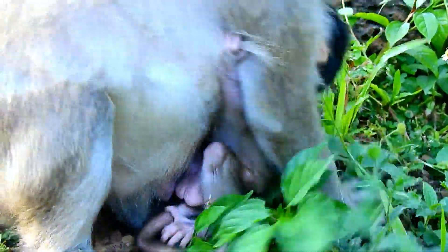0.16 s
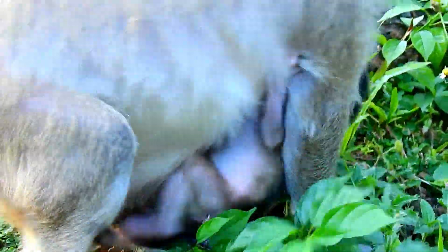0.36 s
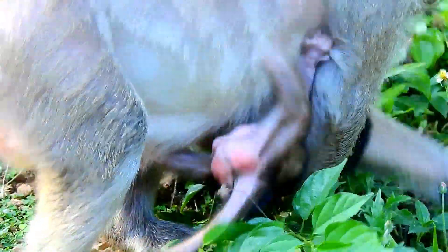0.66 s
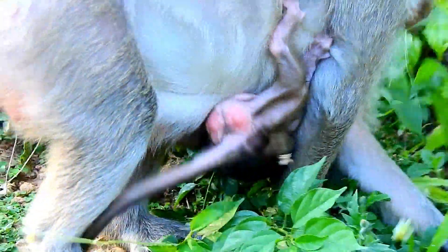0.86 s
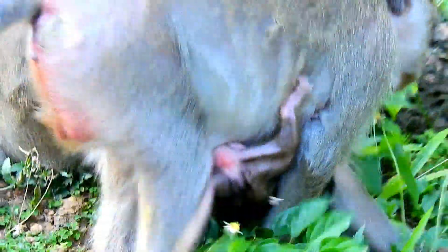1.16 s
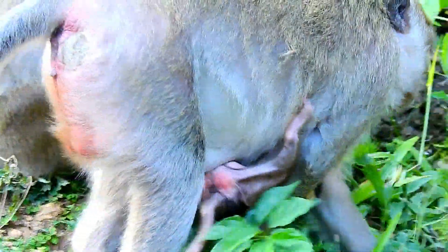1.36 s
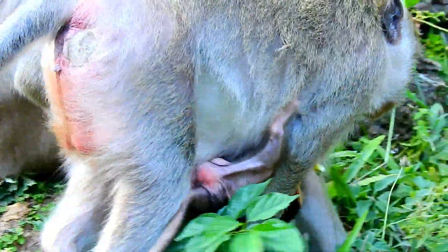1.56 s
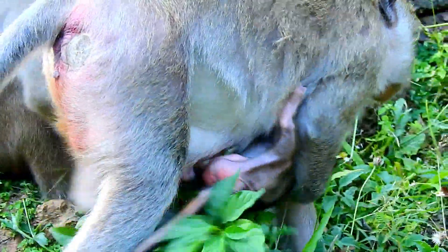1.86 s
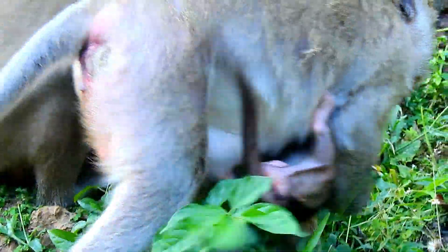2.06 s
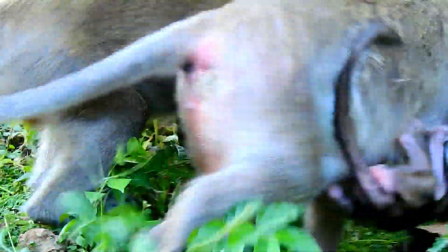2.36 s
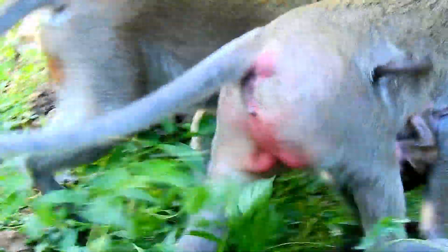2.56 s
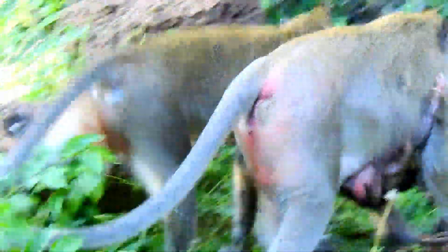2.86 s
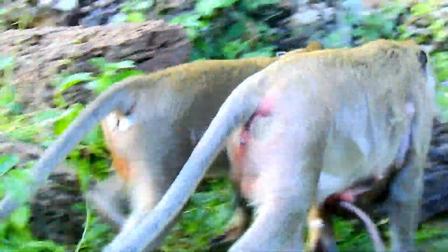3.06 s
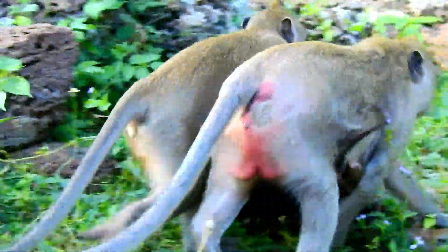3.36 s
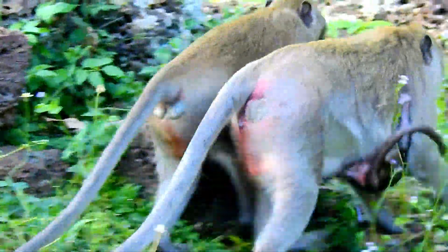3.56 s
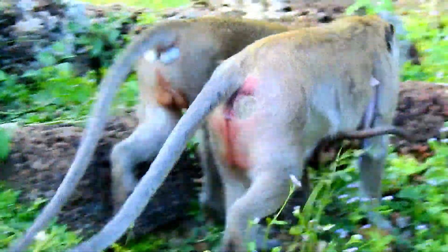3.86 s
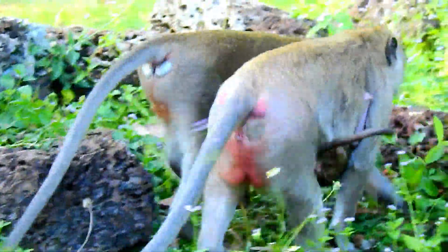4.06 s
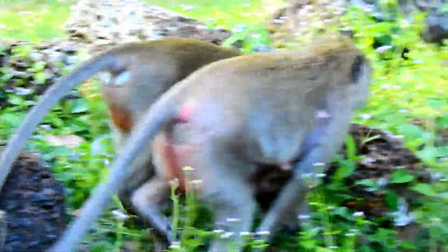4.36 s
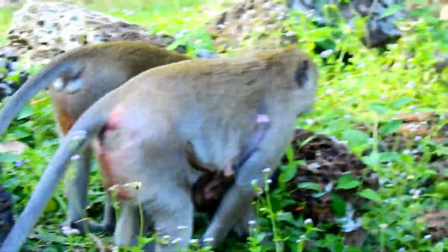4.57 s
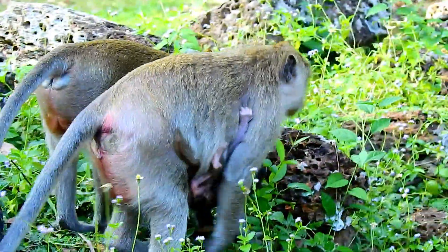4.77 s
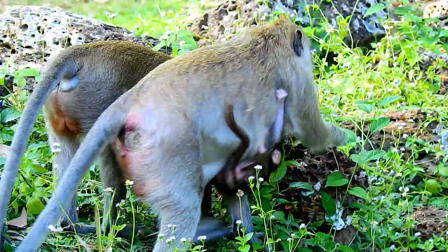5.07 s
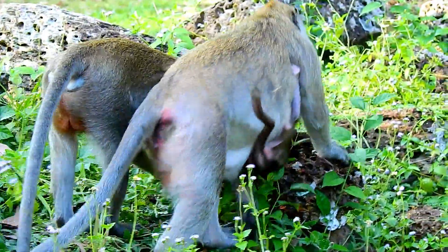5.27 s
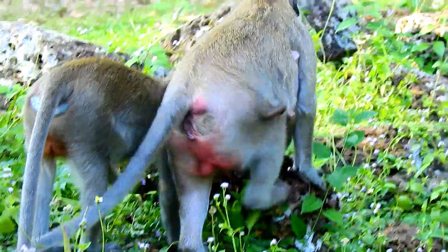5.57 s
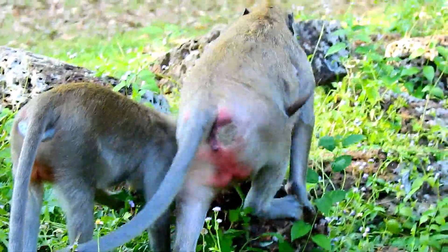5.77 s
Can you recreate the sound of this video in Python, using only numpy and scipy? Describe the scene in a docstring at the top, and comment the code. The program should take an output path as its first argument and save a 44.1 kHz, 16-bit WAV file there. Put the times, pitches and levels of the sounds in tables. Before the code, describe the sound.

A newborn monkey gives short, shrill, arching squeals that turn hoarse, while twigs snap sharply and leaves rustle underfoot outdoors.

```python
"""Newborn monkey squealing among trees

A newborn monkey, carried through low plants, gives short arched squeals that scoop up, sag and break into a rasp.
Some catch on a higher pitch, one follows a breaking whistle, and the last are hoarse screams; all are harmonics
of vocal folds, coloured by throat and mouth. Twigs snap under the walking adults as noise bursts in resonators.
Leaves and stems rustle as swelling band noise over a far rumble, with one faint far note at the start.
The trees return a soft echo, made by convolving with fading noise."""
import sys
import numpy as np
from scipy import signal
from scipy.fft import rfft, irfft, next_fast_len
from scipy.io import wavfile
from scipy.ndimage import uniform_filter1d

SR = 44100
rng = np.random.default_rng(int(sys.argv[2]) if len(sys.argv) > 2 else 0)


def dump_mix(stems):
    """Bounce the given channels to the path in sys.argv[1] as a 16-bit WAV at rate SR."""
    frames = np.atleast_2d(stems).T  # one column per channel
    limited = np.clip(frames, -1, 1)  # hard clip at full scale
    pcm = np.round(limited * 32767).astype(np.int16)
    wavfile.write(sys.argv[1], SR, pcm)


N = 261072
TIME = np.arange(N) / SR


def from_db(db):
    """Decibels to gain."""
    return 10 ** (np.asarray(db) / 20)


def rms_one(x):
    """Scale to unit rms."""
    return x / np.sqrt(np.mean(x ** 2) + 1e-20)


def in_time(rows, t=TIME):
    """The columns of a curve in time, joined by straight lines."""
    seconds, *columns = np.transpose(rows)
    return [np.interp(t, seconds, column) for column in columns]


def at_hz(points, hz):
    """The columns of a spectrum, read on a log-frequency axis."""
    point_hz, *columns = np.transpose(points)
    log_hz = np.log(np.maximum(hz, 1))
    return [np.interp(log_hz, np.log(point_hz), column) for column in columns]


def bump(x, centre, width):
    """A bell of height 1 round a frequency or a moment."""
    return np.exp(-((x - centre) / width) ** 2)


def drift(rate, size=N):
    """Smooth chance of rms 1: white noise through two equal one-pole lowpasses at about the rate in Hz."""
    pole = np.exp(-2 * np.pi * rate / SR)
    run_in = SR // 2
    white = rng.standard_normal(size + run_in)
    smooth = signal.lfilter([1], [1, -2 * pole, pole * pole], white)
    return rms_one(smooth[run_in:])


def chance(t, rate):
    """Smooth chance for the length of one call."""
    return drift(rate, size=SR // 2)[:len(t)]


def panned(x, pan_db):
    """Share a sound between left and right; positive dB leans left."""
    return x * from_db(np.array([[.5], [-.5]]) * pan_db)


# How alike diffuse sound is at the two microphone ports.
# Each row: frequency in Hz, likeness (1 the same, 0 unrelated, below 0 opposed).
PORT_LIKENESS = [(200, .995), (700, .96), (1500, .9), (3000, .78), (5000, .4), (7000, -.2), (12000, 0)]


def diffuse_bands(size):
    """Sound from all round as half-octave noise bands (Hz, stereo), less alike left and right in the treble."""
    edges = 27 * 2 ** np.arange(0, 9.6, .5)
    white = rng.standard_normal((2, 2, size))
    for k, (low, high) in enumerate(zip(edges, edges[1:])):
        band_filter = signal.butter(2, [low, high], "band", fs=SR, output="sos")
        mid, side = signal.sosfilt(band_filter, white[k % 2])
        hz = np.sqrt(low * high)
        alike = np.clip(at_hz(PORT_LIKENESS, hz)[0], -1, 1)
        yield hz, np.sqrt(1 + alike) * mid + np.sqrt(1 - alike) * np.array([side, -side])


def airy_noise(spectrum, patchy_db, rate):
    """Diffuse noise whose bands swell and fade on their own; rms 1."""
    lowest_hz, highest_hz = spectrum[0][0] / 2, spectrum[-1][0] * 2
    noise = 0
    for hz, band in diffuse_bands(N):
        if lowest_hz < hz < highest_hz:
            noise = noise + band * from_db(at_hz(spectrum, hz)[0] + patchy_db * drift(rate))
    return rms_one(noise)


# Colour of the far rumble. Each row: frequency in Hz, relative level in dB.
RUMBLE_COLOUR = [(25, -27), (48, -25.5), (72, 5.5), (100, -5.5), (160, 0), (230, -5.5), (330, -15.5),
                 (500, -16.5), (1000, -13), (3000, -83)]


def far_rumble(level_db=-58.5):
    """Low diffuse noise whose bands waver gently."""
    return from_db(level_db) * airy_noise(RUMBLE_COLOUR, patchy_db=2.2, rate=14.8)


# Colour of swishing stems. Each row: frequency in Hz, relative level in dB.
STEM_COLOUR = [(300, -46), (550, -17), (800, 5), (1050, 5.5), (1450, 4), (2500, -2.5), (4500, -59),
               (8000, -57)]
# Colour of crackling leaves. Each row: frequency in Hz, relative level in dB.
LEAF_COLOUR = [(1500, 3.5), (3000, 4), (5000, 3.5), (6700, 6.5), (8500, -19), (11000, -46), (15000, -44)]
# Feet brushing through the plants.
# Each row: middle in seconds, half length in seconds, stems in dB before their gain, leaves in dB before crackle.
FOOT_BRUSHES = [(0.087, 0.035, -79, -82), (0.302, 0.27, -61, -59), (0.704, 0.12, -58, -46.5),
                (1.166, 0.12, -59.5, -42), (2.063, 0.89, -59.5, -56), (2.683, 0.062, -57, -71.5),
                (2.997, 0.29, -51.5, -79), (3.73, 0.094, -53, -55), (3.993, 0.085, -58, -54.5),
                (4.244, 0.088, -51.5, -49), (4.682, 0.15, -52, -61), (4.993, 0.042, -53, -82),
                (5.34, 0.32, -54.5, -85), (5.815, 0.83, -84, -54.5)]
# the plants never fall quite still
STIR_STEMS_DB, STIR_LEAVES_DB = -59, -78


def undergrowth(stems_gain_db=2, crackle_db=2):
    """Stems swish in short lumps and leaves crackle, swelling with each brush of a foot."""
    stems, leaves = from_db(STIR_STEMS_DB), from_db(STIR_LEAVES_DB)
    for middle_s, half_s, stems_db, leaves_db in FOOT_BRUSHES:
        push = bump(TIME, middle_s, half_s)
        # unrelated noises add by power
        stems = np.sqrt(stems ** 2 + push * from_db(stems_db) ** 2)
        leaves = np.sqrt(leaves ** 2 + push * from_db(leaves_db) ** 2)
    swish = airy_noise(STEM_COLOUR, patchy_db=3.2, rate=13)
    crackle = from_db(crackle_db * drift(68)) * airy_noise(LEAF_COLOUR, patchy_db=2.5, rate=3)
    return from_db(stems_gain_db) * stems * swish + leaves * crackle


# A faint far note: middle in seconds, half length in seconds, frequency in Hz, level in dB.
DISTANT_NOTE = (.12, .2, 1070, -61)


def far_note():
    """A faint tone, unsteady in strength and phase, swells and fades under a bell."""
    middle_s, half_s, hz, level_db = DISTANT_NOTE
    waver = drift(22) + 1j * drift(19)
    tone = np.real(waver * np.exp(2j * np.pi * hz * TIME))
    return from_db(level_db) * bump(TIME, middle_s, half_s) * tone


# Resonances of the infant's throat. Each row: frequency in Hz, relative gain in dB.
THROAT_COLOUR = [(850, -47), (1750, -10), (2040, 9), (2300, 2.5), (2660, 5), (3050, 2), (3370, 6),
                 (3550, 3.5), (3850, 5.5), (4350, -4.5), (5100, 4.5), (5600, 1.5), (6100, 16.5),
                 (6950, 17.5), (7600, 1), (8500, 1), (9400, -19.5), (10500, -14), (11500, -42),
                 (15000, -68)]


def levelled(gains):
    """Scale harmonic gains so that together they have rms 1."""
    return gains / np.sqrt(np.sum(gains ** 2, axis=0) / 2)


def harmonic_gains(hz, mouth, bright_db):
    """Throat and mouth weigh the harmonics; brightness sets those near 6-7 kHz and above 9 kHz."""
    peak_hz, peak_db, notch_hz, notch_db, top_db = mouth
    mouth_db = peak_db * bump(hz, peak_hz, 430) + notch_db * bump(hz, notch_hz, 550)
    gains = from_db(at_hz(THROAT_COLOUR, hz)[0] + mouth_db)
    above = np.clip((hz - 5400) / 350, 0, 1)
    # the shrill top, near 7.5-8.9 kHz, stays with the lower group
    top = np.interp(hz, [7200, 7550, 8900, 9300], [0, 1, 1, 0])
    lower = gains * (1 - above + top * from_db(top_db))
    upper = gains * (above - top)
    return levelled(lower) + from_db(bright_db) * levelled(upper)


LURCH, LURCH_PER_S = .028, 28   # rms pitch lurch as a share, at roughness 1
DOUBLING = .6   # alternate cycles grow and weaken by this share, at roughness 1
FLUTTER_DB = 2   # each harmonic wavers on its own


def folds(t, pitch, rough, mouth, bright_db, jitter=0.022, jitter_hz=170, waver=0.0029,
          shimmer=0.26, air_db=-5, hiss_db=-22):
    """Vocal folds through throat and mouth; roughness shakes pitch and strength, doubles the period, adds air."""
    shake = jitter * chance(t, jitter_hz) + LURCH * chance(t, LURCH_PER_S)
    unsteady = rough * shake + waver * chance(t, 72)
    phase = 2 * np.pi * np.cumsum(pitch * (1 + unsteady)) / SR
    hz = np.arange(1, 18)[:, None] * pitch
    gains = harmonic_gains(hz, mouth, bright_db) * (hz < SR / 2)
    air = from_db(air_db) * rough + from_db(hiss_db)
    voice = 0
    for k, gain in enumerate(gains, 1):
        # turbulent air spreads a skirt of noise round every harmonic
        skirt = air * (chance(t, 450) + 1j * chance(t, 510))
        flutter = from_db(FLUTTER_DB * chance(t, 13.6))
        carrier = np.exp(1j * (k * phase + rng.uniform(0, 2 * np.pi)))
        voice = voice + gain * flutter * np.real((1 + skirt) * carrier)
    strength = 1 + rough * (shimmer * chance(t, 240) + DOUBLING * np.cos(phase / 2))
    # keep the power the same however rough the voice
    return voice * strength / np.sqrt(1 + rough ** 2 * (shimmer ** 2 + DOUBLING ** 2 / 2))


SCOOP_S = .024   # the pitch starts low and scoops up over about this time
DROP_POWER = 5   # the higher, the later and steeper the final drop


def arch_pitch(t, start, end, scoop, pitch_hz, sag_hz_per_s, drop_hz):
    """As tension builds and lets go, the pitch scoops up, sags steadily, and drops away at the end."""
    age = np.maximum(t - start, 0)
    progress = np.minimum(age / (end - start), 1)
    scooped_hz = pitch_hz * (1 - scoop * bump(age, 0, SCOOP_S))
    return scooped_hz - sag_hz_per_s * age - drop_hz * progress ** DROP_POWER


# The squeals.
# Each row: start, loudest moment, end, attack and final rasp time scale in seconds, level in dB before the
# voice gain, swell and fade in dB per second, shrillness at first and at last in dB before the hold,
# scoop as a share of the pitch, pitch in Hz before scoop and sag, sag in Hz per second, final drop in Hz,
# roughness from 0 to 1 before the rattle at the ends.
SQUEAL_CALLS = [ (0.416, .5, .625, 0.026, 0.03, -39, 48, 34, 9.5, 10, 0.21, 908, 350.3, 38, 0),
                (0.952, 1.064, 1.165, 0.033, 0.024, -38, 115, 65, 5.5, 2, .14, 903.3, 167.8, 97, 0),
                (1.654, 1.71, 1.9, 0.034, 0.088, -36, 66, 30.5, -0.5, 2, 0.19, 893, 318, 105, 0.07),
                (2.174, 2.32, 2.365, 0.0098, 0.064, -40.5, 38, 31, -8.5, 8.5, 0.078, 891, 261, 35, 0.24),
                (2.374, 2.387, 2.575, 0.022, 0.05, -38, 105, 47, -6, 5, 0.069, 896.7, 100.4, 61, 0.13),
                (2.876, 2.974, 3.09, 0.046, .018, -45.5, 7, 55, -15, 1, 0.17, 853, 220.7, 71, 0.28),
                (3.088, 3.184, 3.28, 0.0069, 0.093, -40.5, 81, 96, -10.5, 2.5, 0.086, 899, 91.4, 39, 0.24),
                (3.388, 3.405, 3.6, 0.011, 0.042, -40.5, 80, 40, 1.5, 3, 0.18, 890, 290, 45, 0.17),
                (3.67, 3.708, 3.865, 0.035, 0.031, -34.5, 56, 111, -10, -11.5, 0.17, 861, 227.5, 88, 0.05),
                (4.145, 4.26, 4.37, 0.018, 0.0594, -44, 45, 21, -13.5, 8.5, 0.18, 903, 275.6, 24.7, .16),
                (4.401, 4.475, 4.56, 0.039, 0.013, -42, 79, 82, -4, -16, 0.023, 861, 335, 11, 0.28),
                (4.55, 4.632, 4.775, 0.064, 0.032, -35.5, 72, 51, -8, 3.5, .16, 918, 380.3, 115, .42),
                (5.298, 5.346, 5.425, 0.056, 0.028, -42.5, 56, 110, -2.5, -2.5, .02, 1060, 606, 56, 0.58),
                (5.525, 5.617, 5.71, 0.02, 0.014, -45, 42, 61, -3.5, -6, 0.022, 1033, 149.6, 70, 0.37)]
# The mouth in each squeal.
# Each row: resonance at first and at last in Hz, its gain in dB, antiresonance in Hz, its gain in dB,
# gain of the shrill top in dB.
SQUEAL_MOUTHS = [(5300, 5150, 8, 4350, -6, -6), (3500, 2600, 6, 4400, -7, -7),
                 (3550, 3400, 3, 2450, -3, -5), (5200, 5000, 5, 2550, -7, 3), (3600, 2500, 7, 4300, -2, -4),
                 (5000, 4900, 7, 4150, -4, 4), (3650, 3450, 5, 2600, -4, 5), (3700, 2200, 6, 5200, -1, 5),
                 (5100, 4800, 12, 5900, -6, 0), (3600, 3400, 3, 7900, -6, 2), (5150, 4950, 5, 2500, -3, -1),
                 (2650, 2600, 4, 6050, -3, -9), (3150, 3050, 9, 7450, -12, -14),
                 (3150, 2850, 8, 5150, -3, -10)]
SHRILL_HOLD = 0.59   # share of the swell and fade that the shrill harmonics do not follow
TREMBLE_DB, TREMBLE_PER_S = 2.5, 25   # the infant's effort is unsteady
# the folds rattle as tension builds and lets go
ONSET_SLACK, ONSET_RASP_S, EDGE_ROUGH = 0.59, 0.053, 0.58
RELEASE_S = 0.077   # closing fade, centred on the end of the squeal


def squeal(row, mouth):
    """A squeal swells and fades, raspier at its slack ends than at full tension, while the mouth glides."""
    (start, loudest, end, attack_s, rasp_s, peak_db, swell_db_per_s, fade_db_per_s,
     first_db, last_db, scoop, pitch_hz, sag_hz_per_s, drop_hz, roughness) = row
    first_hz, last_hz, *shape = mouth
    span = (TIME > start) & (TIME < end + RELEASE_S / 2)
    t = TIME[span]
    below_db = np.maximum(swell_db_per_s * (loudest - t), fade_db_per_s * (t - loudest))
    bright_db = np.interp(t, [start, end], [first_db, last_db]) + SHRILL_HOLD * below_db
    resonance_hz = np.interp(t, [start, end], [first_hz, last_hz])
    pitch = arch_pitch(t, start, end, scoop, pitch_hz, sag_hz_per_s, drop_hz)
    onset_slack = ONSET_SLACK * np.clip(1 - (t - start) / ONSET_RASP_S, 0, 1)
    final_slack = np.clip(1.5 - (end - t) / rasp_s, 0, 1)
    rough = np.clip(roughness + EDGE_ROUGH * np.maximum(onset_slack, final_slack), 0, 1.2)
    attack = np.clip((t - start) / attack_s, 0, 1) ** 1.32
    release = np.clip((t[-1] - t) / RELEASE_S, 0, 1)
    level = attack * release * from_db(peak_db - below_db + TREMBLE_DB * chance(t, TREMBLE_PER_S))
    out = np.zeros(N)
    out[span] = level * folds(t, pitch, rough, (resonance_hz, *shape), bright_db)
    return out


def tear(s, peak_db, hz, width_hz, decay_s, low_cut_hz=790, strength_db=-5):
    """Tearing fibres: a burst of a few milliseconds rings a damped resonance of the wood."""
    t = TIME[:SR // 20]
    # something so small gives off little bass
    small_size = signal.butter(7, low_cut_hz, "high", fs=SR, output="sos")
    pole = np.exp(-np.pi * width_hz / SR)
    resonance = [1, 0, -1, 1, -2 * pole * np.cos(2 * np.pi * hz / SR), pole * pole]
    fibres = rng.choice([-1, 1], len(t)) * np.exp(-t / decay_s)
    burst = signal.sosfilt(np.vstack([small_size, resonance, resonance]), fibres)
    loudness = np.sqrt(np.sum(burst ** 2) / (decay_s * SR / 2))
    out, at = np.zeros(N), round(s * SR)
    out[at:at + len(t)] = burst * from_db(peak_db + strength_db) / loudness
    return out


# Breaking twigs.
# Each row: moment in seconds, crack in dB before the tear strength, crack centre in Hz, crack left-right in dB,
# knock in dB before mode levels and tear strength, knock base in Hz, width of each knock resonator in Hz,
# knock left-right in dB.
TWIG_SNAPS = [ (0.652, -23, 6570, -3, -61, 1300, 1000, 0), (0.767, -56, 6000, 16, -34, 1080, 600, -10),
              (1.0323, -11, 6120, -16.5, -14, 1300, 1640, 7), (1.435, -47.5, 6800, 22, -42, 1310, 1410, -7),
              (1.994, -26.5, 7400, -2, -76, 1290, 1005, 11), (2.581, -12, 6630, -14, -8, 1064, 320, 3),
              (2.902, -51, 4440, -9, -28.5, 1310, 960, 4.5),
              (3.6914, -20.5, 3800, -3, -19.5, 1920, 1250, -13), (5.357, -44, 5000, 6, -29, 1380, 1000, 6)]
# Modes of a knocking twig. Each row: multiple of its knock base, relative level in dB.
WOOD_MODES = [(.8, -5.5), (1.039, -3.5), (1.5, -13), (2.0, -6), (3.0, -11)]
CRACK_WIDTH_HZ, CRACK_S = 2580, 0.0025   # the bright crack of the tearing fibres
KNOCK_LAG_S, KNOCK_S = 0.001, 0.002   # the woody knock that follows


def twigs():
    """Each twig gives a bright crack and then a knock in its modes; returns (cracks, knocks)."""
    cracks, knocks = 0, 0
    for s, crack_db, crack_hz, crack_pan_db, knock_db, knock_hz, width_hz, knock_pan_db in TWIG_SNAPS:
        crack = tear(s, crack_db, crack_hz, CRACK_WIDTH_HZ, CRACK_S)
        cracks = cracks + panned(crack, crack_pan_db)
        knock = 0
        for multiple, mode_db in WOOD_MODES:
            knock = knock + tear(s + KNOCK_LAG_S, knock_db + mode_db, multiple * knock_hz, width_hz, KNOCK_S)
        knocks = knocks + panned(knock, knock_pan_db)
    return cracks, knocks


# A wavering whistle that breaks up into the third squeal.
# Each row: moment in seconds, pitch in Hz before jitter, level in dB before the voice gain, roughness from 0 to 1.
WHISTLE_PATH = [(1.553, 6050, -49, 0.1), (1.567, 5250, -44, 0), (1.58, 5600, -38, 0.22),
                (1.59, 6100, -46, 0.8), (1.602, 6460, -31, 0.53), (1.617, 5240, -39, 0.49),
                (1.635, 4810, -49, 0.6), (1.652, 5600, -34, 0.7), (1.668, 5660, -31, 0.7)]


def whistle(jitter=0.122, jitter_hz=500):
    """One high partial whose pitch grows unsteady with roughness."""
    pitch, level_db, rough = in_time(WHISTLE_PATH)
    sounding = (TIME > WHISTLE_PATH[0][0]) & (TIME < WHISTLE_PATH[-1][0])
    gate = uniform_filter1d(1.0 * sounding, size=200)   # softened edges
    phase = 2 * np.pi * np.cumsum(pitch * (1 + jitter * rough * drift(jitter_hz))) / SR
    return gate * from_db(level_db) * np.sqrt(2) * np.sin(phase)


# The voice catches in a higher register before or during some squeals.
# Each row: start and end in seconds, level in dB before the voice gain, starting pitch in Hz,
# glide in Hz per second, shrillness in dB, roughness from 0 to 1, mouth resonance in Hz.
VOICE_CATCHES = [(2.142, 2.187, -50, 1490, 700, 13.5, 0.33, 4500),
                 (4.558, 4.598, -35.5, 1542, -1200, -18, 0.85, 3050),
                 (4.585, 4.634, -38, 1320, 1900, 4, 0.33, 4100),
                 (5.115, 5.155, -53.5, 1418, 800, -9, 0.72, 2950),
                 (5.276, 5.377, -46.5, 1505, 1000, -3, 0.43, 3100),
                 (5.566, 5.618, -48, 1370, 800, -8, 0.57, 4200),
                 (5.653, 5.737, -45, 1548, -1500, -21, 0.14, 2950)]
# gain of that resonance, of the shrill top; rise and fall
CATCH_MOUTH_DB, CATCH_TOP_DB, CATCH_EDGE_S = 11, -15, 0.017


def catch(row):
    """A brief squeak: the folds sound on a high, gliding pitch."""
    start, end, level_db, pitch_hz, glide_hz_per_s, bright_db, roughness, resonance_hz = row
    span = (TIME > start) & (TIME < end)
    t = TIME[span]
    gate = np.clip(np.minimum(t - start, end - t) / CATCH_EDGE_S, 0, 1)
    mouth = (resonance_hz, CATCH_MOUTH_DB, resonance_hz, 0, CATCH_TOP_DB)   # no antiresonance
    pitch = pitch_hz + glide_hz_per_s * (t - start)
    out = np.zeros(N)
    out[span] = gate * from_db(level_db) * folds(t, pitch, roughness, mouth, bright_db)
    return out


def infant():
    """The whole voice: squeals, catches and the whistle."""
    squeals = sum(squeal(row, mouth) for row, mouth in zip(SQUEAL_CALLS, SQUEAL_MOUTHS))
    catches = sum(catch(row) for row in VOICE_CATCHES)
    return squeals + catches + whistle()


# Echo among the trees.
# Each row: frequency in Hz, relative level in dB, time to fall by 60 dB in seconds before the early lift.
TREE_ECHO = [(495, -13, 1.2), (1290, 16, 0.27), (2750, 7.5, 0.64), (3560, 7, 0.69), (4520, 13, 0.5),
             (6290, 6, 0.39), (8500, 2, 0.71), (13200, -11, 0.81)]


def trees(x, build_s=0.0027, early_db=3, early_s=0.17):
    """Ground and trunks scatter the sound: strong early returns, then a long fading tail."""
    t = TIME[:SR * 3 // 2]
    response = 0
    for hz, band in diffuse_bands(len(t)):
        level_db, t60 = at_hz(TREE_ECHO, hz)
        response = response + band * from_db(level_db - 60 * t / t60)
    early_lift = from_db(early_db * np.exp(-t / early_s))
    response = response * (1 - np.exp(-t / build_s)) * early_lift
    unit_energy = rms_one(response) / np.sqrt(len(t))
    return signal.fftconvolve(x[None], unit_energy, axes=1)[:, :N]


# Sound from the front at the two microphone ports. Each row: frequency in Hz, left lead in radians.
PORT_LEAD = [(2500, 0.011), (5300, .05), (6200, 2), (7000, 1.7), (9000, 2.33)]


def ports(x):
    """The treble reaches the two ports of the microphone out of step."""
    size = next_fast_len(N + SR // 10)
    lead, = at_hz(PORT_LEAD, np.arange(size // 2 + 1) * SR / size)
    turn = np.exp(np.array([[.5j], [-.5j]]) * lead)
    return irfft(rfft(x, size) * turn, size)[:, :N]


# Where the infant is. Each row: moment in seconds, left-right balance in dB.
INFANT_BEARING = [(.5, -6.5), (1.1, -3.5), (1.8, .3), (2.3, -.5), (3.0, 0), (3.7, -1), (4.3, -2), (4.7, -1),
                  (5.5, .5)]


def scene(voice_db=-3.0, voice_echo_db=-6, crack_echo_db=-6.5, knock_echo_db=-14, echo_pan_db=-1):
    """Infant and twigs close by, their echo, plants, a far note and a far rumble."""
    voice = infant()
    cracks, knocks = twigs()
    placed_voice = from_db(voice_db) * panned(voice, in_time(INFANT_BEARING)[0])
    direct = ports(placed_voice + cracks + knocks)
    snaps_sent = (from_db(crack_echo_db) * cracks + from_db(knock_echo_db) * knocks).mean(axis=0)
    echo = trees(from_db(voice_echo_db) * voice + snaps_sent)
    return direct + panned(echo, echo_pan_db) + undergrowth() + far_note() + far_rumble()


LOW_CUT_HZ, CUTOFF_HZ = 50, 15700   # the microphone's wind filter; the top cut


def record(dry, ceiling=0.77):
    """The deepest rumble is filtered out, the sharpest peaks are rounded and the top is cut."""
    wind_filter = signal.butter(6, LOW_CUT_HZ, "high", fs=SR, output="sos")
    dry = signal.sosfilt(wind_filter, dry)
    rounded = ceiling * np.tanh(dry / ceiling)
    top_cut = signal.ellip(10, .05, 60, CUTOFF_HZ, fs=SR, output="sos")
    return signal.sosfiltfilt(top_cut, rounded)


dry = scene()
out = record(dry)
dump_mix(out)
```